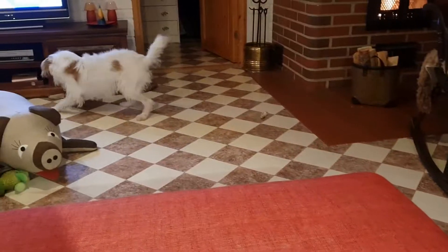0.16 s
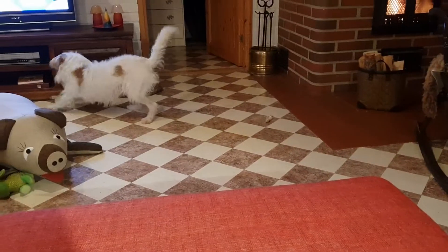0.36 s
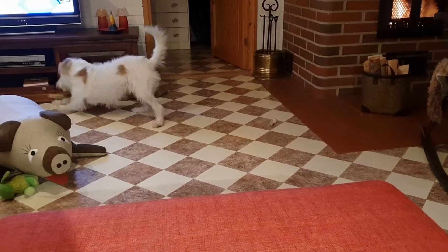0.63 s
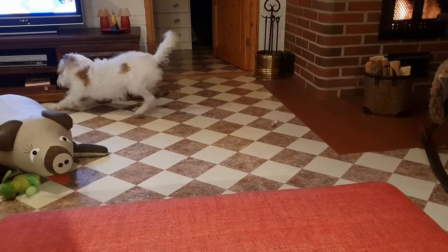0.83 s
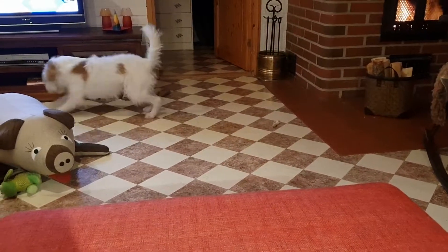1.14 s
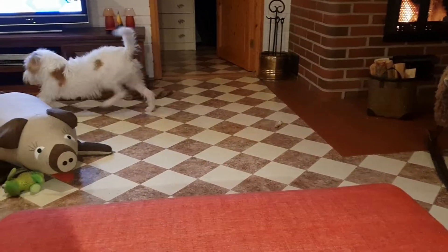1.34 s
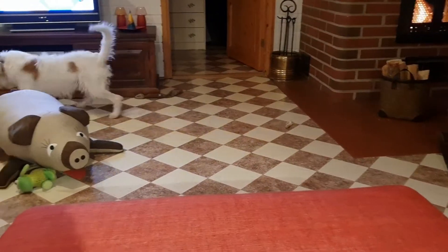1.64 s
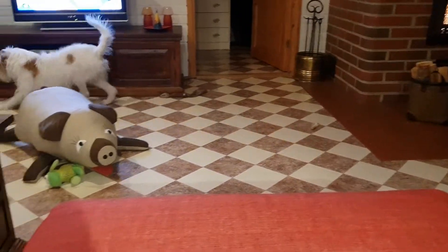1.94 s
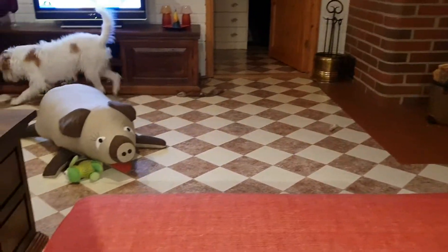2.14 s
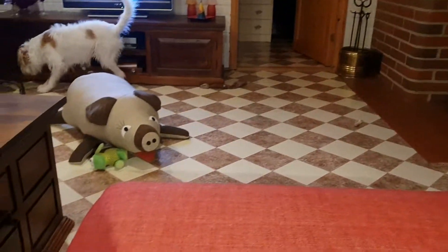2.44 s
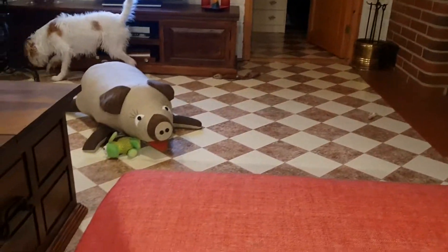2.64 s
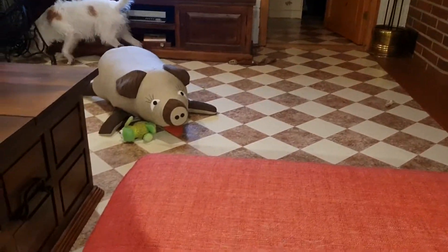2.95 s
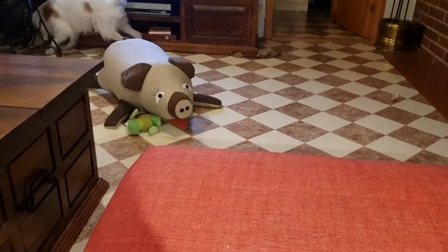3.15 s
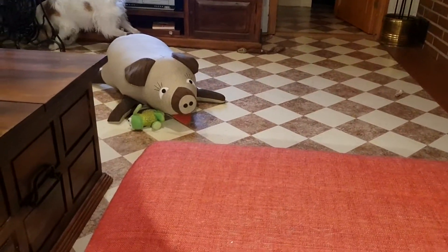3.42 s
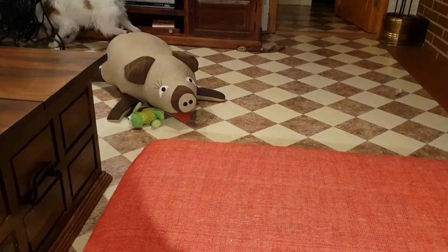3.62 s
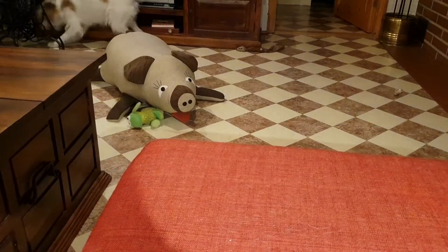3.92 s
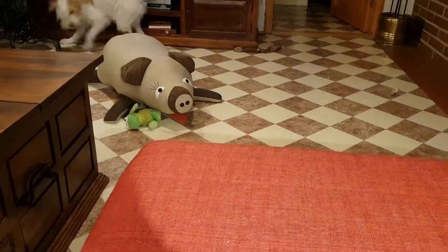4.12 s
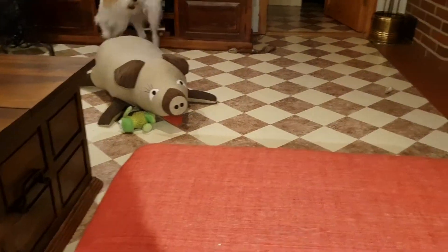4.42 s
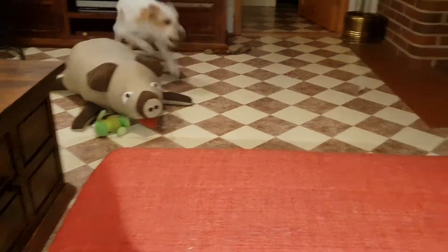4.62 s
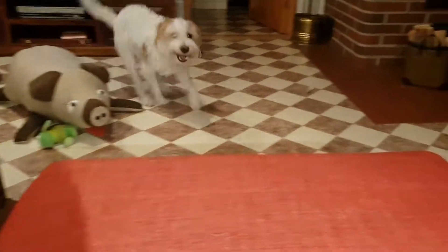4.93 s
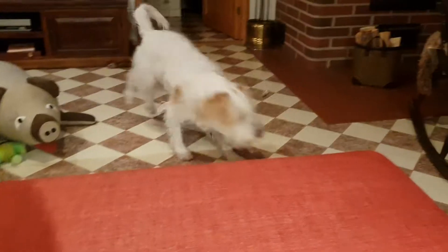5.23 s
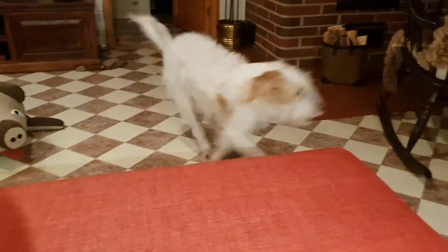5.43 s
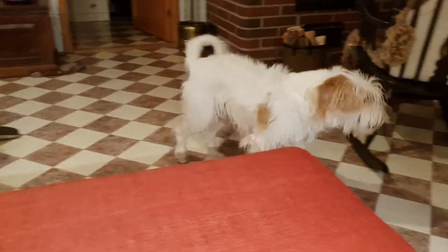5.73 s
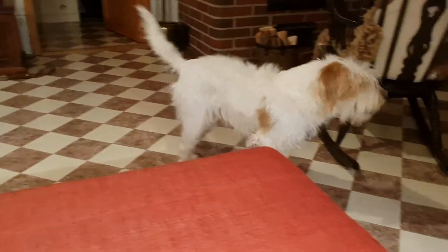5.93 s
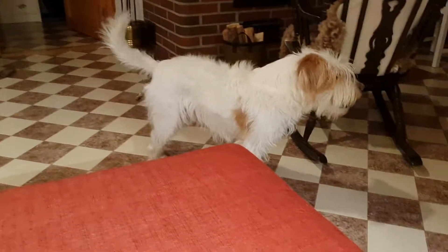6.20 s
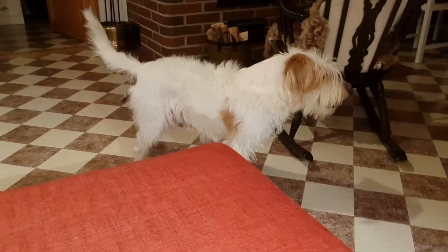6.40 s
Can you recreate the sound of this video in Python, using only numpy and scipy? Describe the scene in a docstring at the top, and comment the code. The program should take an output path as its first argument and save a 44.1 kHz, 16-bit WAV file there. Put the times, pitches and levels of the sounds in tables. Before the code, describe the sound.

Claws scrabble on hard glazed tile, some steps landing with a woody knock, over dense scratchy sliding. The strongest hit comes early, another flurry near two seconds, then things grow quiet with isolated ticks. One quick claw cluster returns after four seconds, and faint rubs and squeaks trail off. Heard from across a small reflective room through handheld microphones, with light handling bumps and a low humming background.

```python
"""A small dog dashes about a tiled living room. Each footfall is a cluster of claw clicks that rings the tile.
Under the footfalls lie thumps and pitched knocks; skids are dense streams of clicks, and there are soft rubs and
two narrow squeaks. The room answers with a short diffuse tail; a few dull bumps come through the hand that
holds the microphones. A low rumble, a wavering hum and a faint hiss lie below."""
import sys
import numpy as np
from scipy import signal
from scipy.fft import rfft, irfft
from scipy.io import wavfile
from scipy.ndimage import uniform_filter1d

SR = 44100
rng = np.random.default_rng(int(sys.argv[2]) if len(sys.argv) > 2 else 0)


def gain_from_db(level_db):
    """Convert decibel levels to linear amplitude factors (20 dB per decade)."""
    decades = np.asarray(level_db, float) / 20
    return 10 ** decades


def digitize_waveform(pressure):
    """Quantize a signal to 16-bit integers and store it at the path in sys.argv[1].

    Rows of a 2-D input are taken as channels; values are limited to [-1, 1].
    """
    field = np.atleast_2d(pressure).T
    bounded = np.clip(field, -1, 1)
    quanta = np.round(bounded * 32767).astype(np.int16)
    wavfile.write(sys.argv[1], SR, quanta)


N = 289408   # length in samples

# Claws meeting the tiles. Each row: start in seconds, crack level in dB before the room, brightness in dB
# against that level, pitch centre in Hz, peak of the first tick in dB against that level.
CLAW_CONTACTS = [(0.0095, -41.5, 1, 4400, 0), (0.0184, -41.5, -15, 2800, 17.5),
                 (0.3185, -39.5, -5, 2504, 0.5), (0.3285, -32, -0.5, 1730, -1),
                 (0.3336, -32.5, -31, 2460, 0.5), (0.3454, -36, -5, 1720, -3),
                 (0.4738, -36.5, -2.5, 4000, -3), (0.4878, -35.5, -5, 1830, 1.5),
                 (0.5443, -44, -29, 1750, 0.5), (0.6519, -33.5, 0, 4800, 16),
                 (0.6885, -21.5, -7, 2400, 10.5), (0.6938, -43, -21, 2470, 13), (0.7198, -50, -6, 2450, 21),
                 (0.8445, -36, -9.5, 2780, 18), (0.8594, -34.5, -5.5, 2530, -1.5),
                 (0.9727, -39, -5.5, 2520, 0.5), (1.0595, -37.5, -6.5, 4560, 18),
                 (1.1218, -48, -12, 4760, 0), (1.1794, -48, -7, 2580, 0), (1.2690, -41.5, -4, 4460, 8.5),
                 (1.3394, -54.5, -13.5, 2720, 0), (1.3964, -80, -12, 2610, 15), (1.4925, -48, -6, 2690, 20),
                 (1.5723, -43, -5.5, 4170, 9.5), (1.6407, -47, -9, 2830, 3),
                 (1.7195, -46.5, -6, 2800, -0.5), (1.7674, -39.5, -0.5, 2560, -11),
                 (1.7894, -40.5, 2.5, 3670, -1), (1.8726, -43, 1.5, 4800, 8), (1.9080, -32, -7.5, 2810, 20),
                 (1.9494, -40.5, -14, 2830, 0), (2.0117, -44.5, -5, 2520, 0),
                 (2.0263, -36.5, -4, 4260, 14.5), (2.1912, -41.5, -7, 1600, 14),
                 (2.3205, -45.5, -6, 3750, 20), (2.5366, -52, 1, 4600, 22.5), (2.5434, -55.5, -1, 4250, 14),
                 (2.548, -55, -17, 2370, -5), (2.7826, -59, -5.5, 3670, 12), (2.9592, -65, -10, 2754, 6),
                 (2.972, -70.5, -15, 2600, 1), (3.1742, -69, 1, 2760, 30), (3.305, -75, 7.5, 4800, -1),
                 (3.5039, -58.5, -6.5, 3470, 2.5), (3.5294, -58.5, -6, 3530, 2.5),
                 (3.5994, -64, -5, 3620, -2), (3.6576, -64, -2, 4900, 12), (4.0622, -63.5, -7.5, 2480, 0.5),
                 (4.1689, -64, -4, 1584, 0), (4.5166, -62, -9, 2480, 2), (4.5336, -44, -5, 4170, 13.5),
                 (4.5461, -42, -8.5, 1540, 4), (4.5885, -35, -2.5, 4600, 16),
                 (4.5963, -38, -10, 2930, 23.5), (4.6094, -37, -2.5, 2820, 19),
                 (4.6240, -43, -40, 4600, 26), (4.7994, -69.5, 6.5, 3770, -8), (5.2225, -54, -8.5, 2460, 4),
                 (5.5368, -62, -4.5, 3630, 10), (6.0494, -80.5, -15, 4234, 0)]
# Thumps and pitched knocks under the footfalls, low thuds to ringing taps. Each row: start in seconds,
# level in dB before the room, own pitch in Hz, hollow modes in dB against that level.
KNOCKS = [(0.331, -46.5, 920, 11.5), (0.342, -30, 697, -16.5), (0.362, -41.5, 700, -18),
          (0.389, -44, 810, -24), (0.49, -46, 1790, -20), (0.68, -43.5, 307, 2.5), (0.69, -24, 820, -17),
          (0.719, -42, 700, -21.5), (0.776, -53.5, 755, -27), (1.206, -66.5, 200, -7),
          (2.036, -35.5, 750, -11), (2.046, -43, 404, -35), (2.044, -36, 1320, -31), (2.085, -47, 736, -13),
          (2.191, -56, 1520, -20), (2.785, -64.5, 1670, -25), (3.511, -66, 1100, -9.5),
          (4.073, -63.5, 1020, -16.5), (4.094, -67.5, 980, -29.5), (4.179, -61, 880, -30),
          (4.542, -59, 1600, -37), (4.593, -45, 1315, -22), (4.625, -47, 1390, -21),
          (4.914, -67, 646, -14.5), (5.225, -62.5, 784, -6), (5.539, -66, 833, -13.5)]
# Claws sliding, as a curve. Each row: time in seconds, level in dB before the room.
SKID_LEVEL = [(0.0, -44.5), (0.14, -77), (0.3, -61), (0.38, -51), (0.55, -42), (0.69, -70), (0.93, -45.5),
              (1.25, -51.5), (1.57, -57.5), (1.95, -45.5), (2.3, -56.5), (2.5, -73), (3.3, -87.5),
              (4.53, -74.5), (4.69, -62), (4.8, -68), (5.44, -78), (5.7, -81.5), (6.56, -85)]
# Hollow modes that a knock rings. Each row: pitch in Hz, width in Hz before a small widening, strength in dB.
HOLLOW_MODES = [(149.8, 21, -13), (223, 84, -6), (387.1, 11, -1), (680, 53, 0), (1320, 8, -20),
                (1650, 300, -1)]
# The room's answer along the pitch range. Each row: pitch in Hz, level in dB, time to die by 60 dB in seconds,
# likeness of left and right from -1 (opposite) to 1 (the same).
ROOM_ANSWER = [(97, 13, 0.88, 0.98), (163, 9, 0.56, 1), (367, 13.5, 0.4, 1), (700, 2, 0.41, .45),
               (1510, 4, 0.4, -0.3), (1990, -2, 0.46, 0.28), (2800, 1, 0.39, -0.094),
               (4000, 1.5, 0.38, -0.3), (5640, -4.5, 0.37, 0.43), (7655, 4, 0.3, -0.29),
               (9100, -12, 0.17, 0.31), (13100, -4.5, 0.33, 0.17), (16700, -16, 0.3, -.3)]
# Colour of the quiet room. Each row: pitch in Hz, relative level per Hz in dB.
QUIET_COLOUR = [(12, -69), (20, -37), (48, -27), (63, -17.5), (86, -6), (142, -18), (262, -26.5),
                (301, -31), (542, -47.5), (660, -39.5), (718, -43.5), (2020, -55), (4300, -51),
                (8180, -57.5), (16000, -47)]
# Dull bumps through the hand. Each row: start in seconds, noise level in dB before the swell shapes it.
HAND_BUMPS = [(1.216, -34), (1.26, -45), (1.7, -36.5), (4.741, -45), (4.821, -48.5), (5.202, -47.5)]
# Drags and squeaks: broad soft rubs, and two narrow squeaks near 1030 and 1650 Hz. Each row: start in seconds,
# length in seconds, level in dB before swell and room, centre in Hz, sharpness (centre divided by width)
# of the narrower of two resonances.
DRAGS_AND_SQUEAKS = [(3.144, 0.16, -57.5, 2100, 1.04), (3.673, 0.051, -65, 1000, 2.3),
                     (4.435, 0.13, -66.5, 2800, 0.77), (4.859, 0.055, -55, 970, 0.87),
                     (5.045, .13, -71, 1030, 5.8), (5.099, .05, -75, 1650, 7.1),
                     (5.311, 0.11, -54, 1050, 1.06), (5.505, 0.16, -65, 6000, .7),
                     (4.998, 0.077, -69, 6500, 0.87)]
# What the tiles ring with: each entry is a pitch in Hz.
TILE_PITCHES_HZ = [1450, 1640, 2460, 2780, 3580, 4250, 4800]

QUIET_DB = -58.5   # level of rumble and hiss
LEFT_LAG_S, LEFT_DB = -0.00015, 1.0   # negative: left is earlier; left is raised and right lowered by this
RING_DB, RING_PER_DULLNESS, RING_TOP_DB = -26, 2.2, -4   # duller contacts ring the tile more, up to a limit
TILE_Q, MODE_REACH_OCT = 7.5, 0.22   # sharpness of each ring filter; how far from its centre a contact excites modes
PAD_DB, PAD_DB_PER_OCT = -19.5, -0.5   # pad's share of a footfall; higher contacts carry less of it
CLUSTER_S, CRACK_LOW_SHARE = 0.0067, 0.56   # fade time of the clicks; crack starts at this share of the centre
KNOCK_S, KNOCK_WIDTH_HZ = 0.0084, 330.0   # fade time of a blow; width of each filter at its own pitch


def in_time(rows):
    """Read the columns of a curve at every sample."""
    s, *columns = np.transpose(rows)
    return [np.interp(np.arange(N) / SR, s, c) for c in columns]


def at_hz(rows, hz, column):
    """Read one column of a table, sliding between rows by musical distance."""
    rows = np.array(rows)
    return np.interp(np.log(hz), np.log(rows[:, 0]), rows[:, column])


def rms_one(x):
    """Scale to an average strength (rms) of one."""
    return x / np.sqrt(np.mean(x ** 2) + 1e-20)


def band(x, low_hz, high_hz):
    """Keep the range between two pitches with a Butterworth filter."""
    sections = signal.butter(2, [low_hz, min(high_hz, SR / 2.1)], "band", fs=SR, output="sos")
    return signal.sosfilt(sections, x)


def resonance(x, hz, width_hz):
    """Ring at one pitch: a two-pole filter with a gain of about one at its peak."""
    r = np.exp(-np.pi * width_hz / SR)
    return signal.lfilter(np.array([1, 0, -1]) * (1 - r * r) / 2, [1, -2 * r * np.cos(2 * np.pi * hz / SR), r * r], x)


def clicks(size, per_s, spread_db):
    """Scatter random clicks of uneven size and sign."""
    chance, sign, luck = rng.random((3, size))
    height = gain_from_db(-spread_db * np.log(luck + 0.031))
    return (chance < per_s / SR) * np.sign(sign - 0.5) * height


def add(track, piece, s):
    """Mix a piece into a track at a time in seconds."""
    i = round(s * SR)
    track[i:i + len(piece)] += piece[:N - i]


def contact(length_s, per_s, first):
    """A touch: a first click, then a cluster that dies away, with its colour kept even."""
    t = np.arange(4096) / SR
    cluster = clicks(len(t), per_s, 0.77) * np.exp(-t / np.clip(length_s, 0.0005, 0.05))
    cluster[0] = first
    spectrum = rfft(cluster)
    smooth_power = uniform_filter1d(abs(spectrum) ** 2, size=30)
    return irfft(spectrum / np.sqrt(smooth_power)) * (t < 0.05)


def noise_bands(size):
    """Third-octave bands of stereo noise, as alike left and right as the room makes them."""
    edges = 20 * 2 ** (np.arange(30) / 3)
    white = rng.standard_normal((2, 2, size))
    for k, (low, high) in enumerate(zip(edges, edges[1:])):
        # neighbouring bands take turns between two separate noises
        mid, side = band(white[k % 2], low, high)
        hz = np.sqrt(low * high)
        alike = np.clip(at_hz(ROOM_ANSWER, hz, column=3), -1, 1)
        yield hz, np.sqrt(1 + alike) * mid + np.sqrt(1 - alike) * side * [[1], [-1]]


def skid():
    """Claws dragging over the glaze make dense small clicks."""
    level_db, = in_time(SKID_LEVEL)
    return gain_from_db(level_db) * rms_one(band(clicks(N, 2200.0, 4.0), 690, 8500))


def quiet_room(hum_hz=84.0, hum_width_hz=13.0, hum_db=-6.0):
    """Noise through narrow resonances wavers as a low hum, over coloured noise for rumble and hiss."""
    hum = resonance(rng.standard_normal(N), hum_hz, hum_width_hz)
    hum = resonance(hum, hum_hz, 2 * hum_width_hz)
    hiss = sum(gain_from_db(at_hz(QUIET_COLOUR, hz, column=1)) * noise for hz, noise in noise_bands(N))
    return gain_from_db(QUIET_DB) * (rms_one(hiss) + gain_from_db(hum_db) * rms_one(hum))


def tile_ring(hit, centre_hz):
    """The tile modes near the pitch centre of a contact ring most."""
    ring = 0
    for hz in TILE_PITCHES_HZ:
        share = np.exp(-(np.log2(hz / centre_hz) / MODE_REACH_OCT) ** 2)
        ring = ring + share * resonance(resonance(hit, hz, hz / TILE_Q), hz, hz / TILE_Q)
    return rms_one(ring * 1e6)   # lifted first so that even a tiny ring reaches full strength


def footfalls():
    """Claw clicks: one cluster heard as crack, soft pad and bright edge, plus the ring of the tile."""
    out = np.zeros(N)
    for s, level_db, bright_db, centre_hz, _ in CLAW_CONTACTS:
        hit = contact(CLUSTER_S, 1800.0, 1.3)
        crack = rms_one(band(hit, CRACK_LOW_SHARE * centre_hz, 5680))
        ring_db = min(RING_DB - RING_PER_DULLNESS * bright_db, RING_TOP_DB)
        ring = gain_from_db(ring_db) * tile_ring(hit, centre_hz)
        pad_db = PAD_DB + PAD_DB_PER_OCT * np.log2(centre_hz / TILE_PITCHES_HZ[2])
        pad = gain_from_db(pad_db) * rms_one(band(band(hit, 670, 2400), 670, 2400))
        bright = gain_from_db(bright_db) * rms_one(band(hit, 3900, 11600))
        add(out, gain_from_db(level_db) * (crack + ring + pad + bright), s)
    return out


def ticks():
    """The first claw of a footfall: a very short broad click without room, earlier in the left microphone."""
    out = np.zeros(N)
    for s, level_db, _, centre_hz, tick_db in CLAW_CONTACTS:
        tick = band(contact(0.0019, 7800.0, 1.5), centre_hz / 2.2, 9500.0)
        add(out, gain_from_db(level_db + tick_db) * tick / abs(tick).max(), s)
    lags = (np.round(LEFT_LAG_S * SR), 0)   # left and right, in samples
    return np.array([np.interp(np.arange(N) - lag, np.arange(N), out) for lag in lags])


def thumps_and_knocks():
    """A short blow sounds at its own pitch and rings the hollow modes."""
    out = np.zeros(N)
    for s, level_db, pitch_hz, modes_db in KNOCKS:
        blow = contact(KNOCK_S, 1200.0, 1.1)
        modes = 0
        for k, (hz, width_hz, db) in enumerate(HOLLOW_MODES):
            # every other mode is turned upside down
            modes = modes + gain_from_db(db) * resonance(blow, hz, width_hz + 6.3) * (-1) ** k
        own = resonance(resonance(blow, pitch_hz, KNOCK_WIDTH_HZ), pitch_hz, KNOCK_WIDTH_HZ)
        hollow = gain_from_db(modes_db) * rms_one(band(modes, 130, 1200))
        add(out, gain_from_db(level_db) * (rms_one(own) + hollow), s)
    return out


def bumps():
    """Bumps felt through the hand: short swells of low noise."""
    out = np.zeros(N)
    t = np.arange(8192) / SR
    swell = t / 0.033 * np.exp(-t / 0.031)
    for s, level_db in HAND_BUMPS:
        low_noise = rms_one(band(rng.standard_normal(len(t)), 39, 158))
        add(out, gain_from_db(level_db) * low_noise * swell, s)
    return out


def drags_and_squeaks():
    """Fine grains swell and fade through two resonances: broad ones rub softly, narrow ones squeak."""
    out = np.zeros(N)
    t = np.arange(SR // 3) / SR
    for s, length_s, level_db, centre_hz, sharpness in DRAGS_AND_SQUEAKS:
        grains = clicks(len(t), 6300.0, 2.0)
        width_hz = centre_hz / max(sharpness, 0.3)
        rub = rms_one(resonance(resonance(grains, centre_hz, width_hz), centre_hz, 2 * width_hz))
        swell = np.sin(np.pi * np.clip(t / length_s, 0, 1))
        add(out, gain_from_db(level_db) * rub * swell, s)
    return out


def one_place(direct_db=-9.5, build_s=0.0016, early_db=-1.5, early_s=0.0078):
    """The room's answer to one spot: direct sound, then reflections that thicken and die band by band."""
    t, tail = np.arange(SR // 2) / SR, 0
    # near walls answer first and strongest
    early = (1 - np.exp(-t / build_s)) * (1 + gain_from_db(early_db) * np.exp(-t / early_s))
    for hz, noise in noise_bands(len(t)):
        shape = early * gain_from_db(-60 * t / at_hz(ROOM_ANSWER, hz, column=2))
        energy = np.sqrt(np.mean(shape ** 2) * hz / SR)   # every spot returns the same energy in a band
        tail = tail + gain_from_db(at_hz(ROOM_ANSWER, hz, column=1)) * energy * rms_one(shape * noise)
    # 64 samples of lead leave space for the earlier left side
    answer = np.roll(tail / np.sqrt(SR / 26), 64, axis=1)
    hz = np.arange(1, 258) * SR / 512
    lag_s = 64 / SR + np.array([[LEFT_LAG_S], [0]])
    direct_gain = gain_from_db(direct_db + at_hz(ROOM_ANSWER, hz, column=1))
    answer[:, :512] += irfft(direct_gain * np.exp(-2j * np.pi * hz * lag_s))
    return answer


def room(x, count=5, stay_s=0.1):
    """The dog keeps moving, so the sound passes smoothly from one spot to the next, round and round."""
    path = np.arange(N) / (stay_s * SR)
    out = 0
    for k in range(count):
        away = np.minimum(abs((path - k + count / 2) % count - count / 2), 1)
        here = x * np.cos(np.pi / 2 * away)
        out = out + signal.oaconvolve(here[None], one_place(), axes=1)
    return out[:, 64:N + 64]   # takes the 64 samples of lead off again


def scene():
    """The dog in the room, with the roomless ticks and bumps on top."""
    return room(footfalls() + thumps_and_knocks() + skid() + drags_and_squeaks()) + ticks() + bumps()


def suppressor(x, knee_db=-96.0, depth_db=-3.0, low_hz=450.0):
    """Noise suppression: above low_hz, faint bands are turned down by up to 3 dB, which thins the tails."""
    hz, t, z = signal.stft(x, SR, nperseg=512)
    power = uniform_filter1d(np.mean(abs(z) ** 2, axis=0), size=12, axis=0)   # smooth over pitch
    power = uniform_filter1d(power, size=5, axis=1)   # smooth over time
    open_share = power ** 2 / (power ** 2 + gain_from_db(4 * knee_db))
    gain = np.where(hz[:, None] < low_hz, 1, gain_from_db(depth_db * (1 - open_share)))
    return signal.istft(z * gain, SR, nperseg=512)[1][:, :N]


def low_pass(x):
    """Removes everything above the highest recorded frequency."""
    return signal.sosfilt(signal.butter(12, 16150, fs=SR, output="sos"), x)


def record(dry):
    """Suppress noise, add the steady quiet room, tilt the balance to the left and round off the peaks."""
    heard = (suppressor(dry) + quiet_room()) * gain_from_db([[LEFT_DB], [-LEFT_DB]])
    mix = np.tanh(heard)
    return low_pass(mix)


dry = scene()
out = record(dry)
digitize_waveform(out)
```